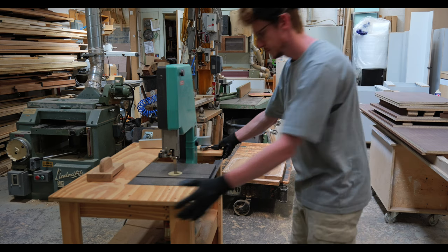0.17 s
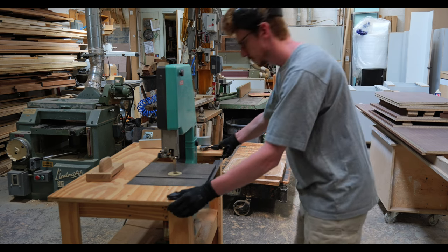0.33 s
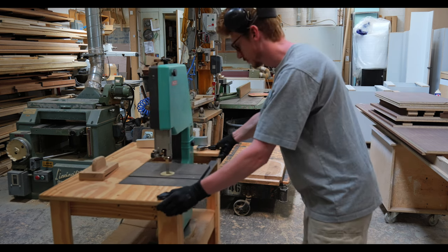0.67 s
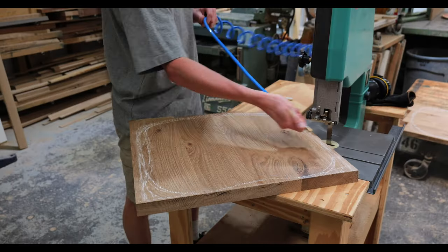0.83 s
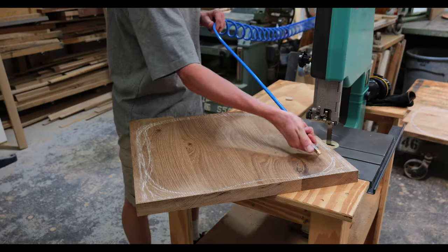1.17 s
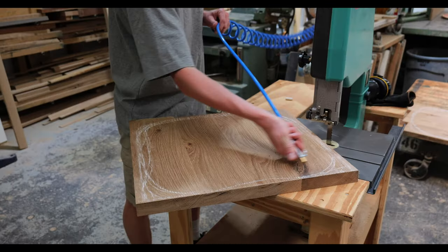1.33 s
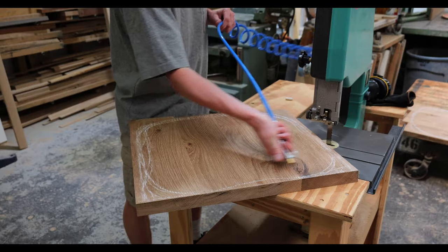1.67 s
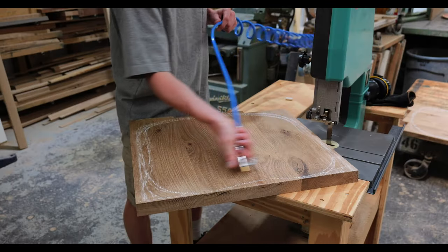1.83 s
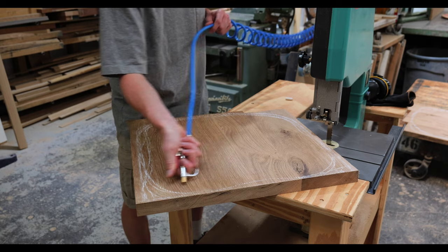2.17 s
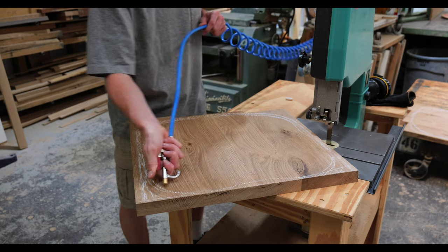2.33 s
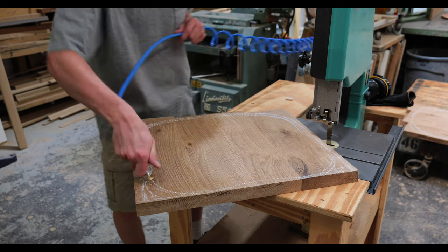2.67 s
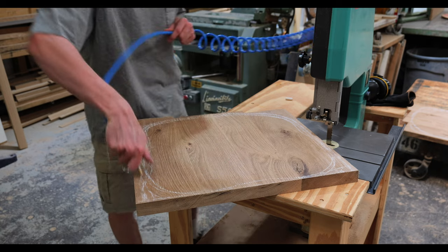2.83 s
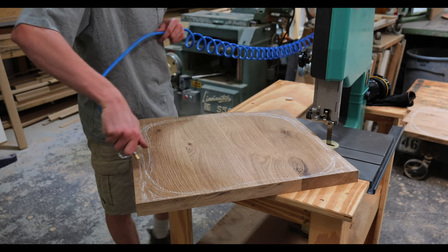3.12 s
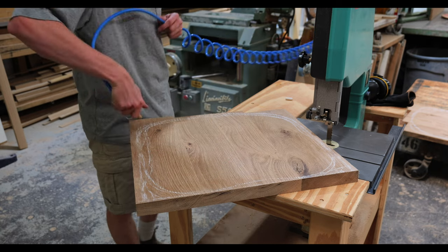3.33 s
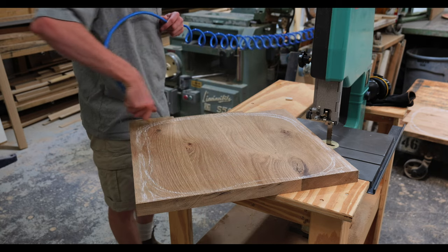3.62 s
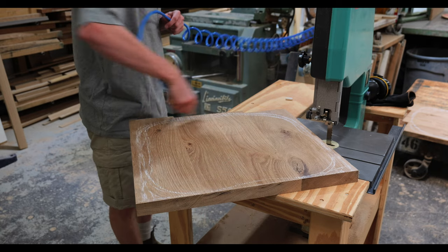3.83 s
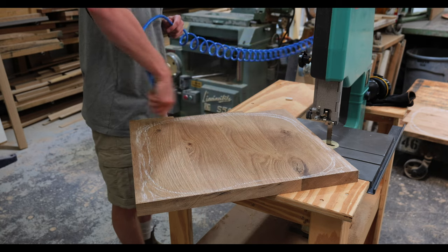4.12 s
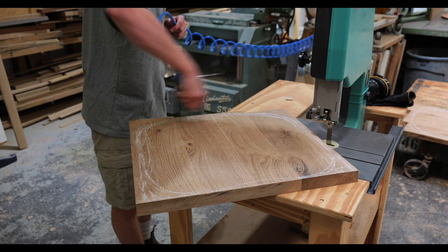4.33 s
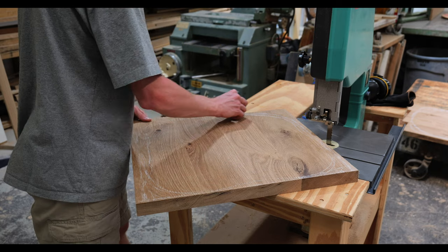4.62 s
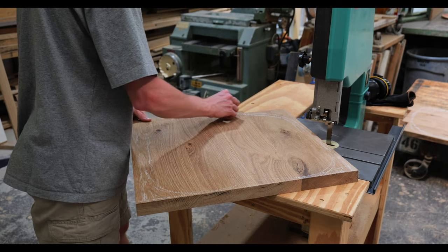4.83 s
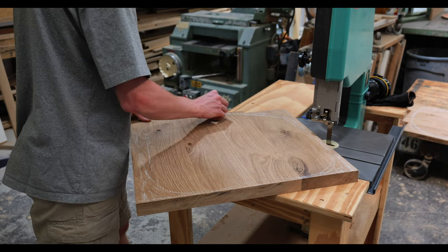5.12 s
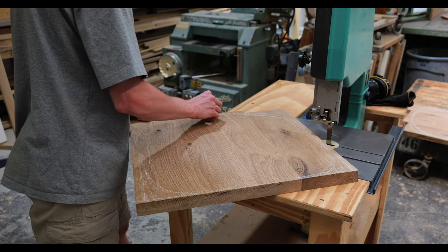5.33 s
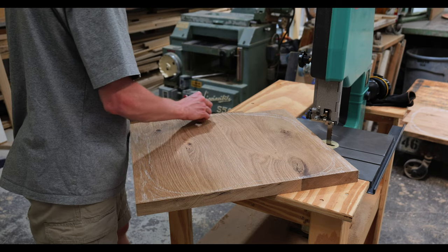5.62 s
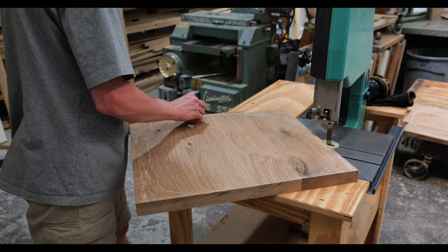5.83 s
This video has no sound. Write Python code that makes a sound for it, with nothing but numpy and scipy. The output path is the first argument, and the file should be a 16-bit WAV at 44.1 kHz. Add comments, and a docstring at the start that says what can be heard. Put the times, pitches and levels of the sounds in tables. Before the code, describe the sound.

In a quiet woodshop, hands knock softly on a wooden bench and a shoe scuffs, followed by one hard clack from across the room. A compressed-air blow gun then hisses loudly and close by, sweeping over a wooden tabletop. The full rush turns into hollow, uneven puffs and high sizzles at the board's edge. The air cuts off abruptly, leaving a faint machine hum and a thin air leak.

```python
"""Hands knock on a band saw's wooden bench, ringing its modes, while a shoe scuffs and a faint high tone
passes; then something clacks hard across the woodshop. The scene changes: a compressed-air blow gun sweeps dust
off an oak tabletop. Its turbulent jet makes a rush on the wood, hollow resonances, a sizzle and a hiss whose
colour swings as the jet crosses the board's edge. The scene changes again, to the shop's steady noise alone: a
machine's hum and a thin leak of air."""
import sys
import numpy as np
from scipy import signal
from scipy.fft import rfft, irfft, next_fast_len
from scipy.io import wavfile
from scipy.ndimage import uniform_filter1d

SR = 44100
rng = np.random.default_rng(int(sys.argv[2]) if len(sys.argv) > 2 else 0)


def int16_out(signal):
    """Quantize to a 16-bit WAV file."""
    q = np.round(np.clip(np.atleast_2d(signal).T, -1, 1) * 32767)
    wavfile.write(sys.argv[1], SR, q.astype(np.int16))


N = 264114
AIR_ON_S, AIR_OFF_S = 0.8727, 4.661
FRAME, HOP = 512, 128
TIME = np.arange(N) / SR
FRAME_S = np.arange(N // HOP + 2) * HOP / SR
BIN_HZ = np.maximum(np.fft.rfftfreq(FRAME, 1 / SR), 1)[:, None]

# reverberation time of the shop: f/Hz, T60/s
SHOP_T60 = [(150, 0.48), (1000, 0.61), (3000, 0.56), (7000, 0.74), (15000, 0.13)]
# the jet moves from mid-board to the edge: t/s, unsteadiness, lowest resonance's width/Hz, rush corner f/Hz
GRAZE = [(.9, 0.57, 168, 446), (2.1, 0.62, 220, 440), (2.65, 1.1, 360, 387), (2.8, 1.1, 600, 680),
         (3.7, 0.73, 636, 550), (4.6, 1.17, 610, 566)]
# the lowest resonance follows the nozzle's aim: t/s, f/Hz, relative level/dB
AIM = [(.9, 1670, -0.5), (1.2, 1705, 4.5), (1.5, 1830, 3.5), (1.95, 1720, 1), (2.35, 1910, -2),
       (2.8, 1840, -5.5), (3.05, 1950, 4), (3.25, 1980, -2.5), (4.45, 2070, -4.5), (4.62, 1970, -1)]


def amp(db):
    """Amplitude ratio of a level in decibels."""
    return 10 ** (np.asarray(db) / 20)


def rms_one(x):
    """Normalisation to unit rms."""
    return x / np.sqrt(np.mean(x ** 2) + 1e-20)


def follow(rows, times):
    """Linear interpolation of each column of a table in time."""
    s, *columns = np.transpose(rows)
    return [np.interp(times, s, c) for c in columns]


def at_hz(points, hz):
    """Interpolation on a logarithmic frequency axis."""
    f, value = np.transpose(points)
    return np.interp(np.log(np.maximum(hz, 1)), np.log(f), value)


def drift(rate_hz):
    """Random modulation: low-passed noise, softly bounded, with a spread near 1."""
    pole = np.exp(-80 * np.pi * rate_hz / SR)   # one step per 40 samples
    slow = signal.lfilter([1], [1, -2 * pole, pole * pole], rng.standard_normal(N // 40 + 2002))[2000:]
    bounded = 2 * np.tanh(rms_one(slow) / 1.7)
    return np.interp(np.arange(N) / 40, np.arange(len(slow)), bounded)


def steady_noise(spectrum):
    """Stationary noise of a given spectral shape and unit rms."""
    size = next_fast_len(N, True)
    gain = amp(at_hz(spectrum, np.fft.rfftfreq(size, 1 / SR)))
    return rms_one(irfft(rfft(rng.standard_normal(size)) * gain, size)[:N])


def moving_noise(gain):
    """Time-varying filtering of white noise, with one gain per bin and frame."""
    frames = signal.stft(rng.standard_normal(N), nperseg=FRAME, noverlap=FRAME - HOP)[2]
    return signal.istft(frames * gain[:, :frames.shape[1]], nperseg=FRAME, noverlap=FRAME - HOP)[1][:N]


def burst(start_s, t60):
    """Exponential decay from a sudden onset."""
    return (TIME >= start_s) * amp(np.maximum(-60 * np.abs(TIME - start_s) / t60, -300))


def swell(middle_s, length_s):
    """Gaussian envelope, about 9 dB down at either end of its length."""
    return np.exp(-np.minimum((2 * (TIME - middle_s) / length_s) ** 2, 50))


def reverberation(x, build_s=0.017):
    """Diffuse field of the shop: a decaying tail of unit energy whose highest treble dies first."""
    tail = moving_noise(amp(-60 * FRAME_S / at_hz(SHOP_T60, BIN_HZ)))[:SR]
    tail = tail * np.clip(TIME[:SR] / build_s, 0, 1) ** 2
    return signal.fftconvolve(x, tail / np.sqrt(np.sum(tail ** 2)))[:N]


def quiet_shop(level_db=-65.5):
    """Ambient noise: stationary, broadband and strongest in the bass."""
    # ambient spectrum: f/Hz, relative level/dB
    spectrum = [(18, -63), (30, -56), (111, -6.5), (379, -8.5), (575, -17), (622, -15), (1140, -14),
                (1330, -16), (1910, -18), (2240, -20.5), (15500, -29.5)]
    return amp(level_db) * steady_noise(spectrum)


def ring(x, hz, t60):
    """Forced response of a damped mode with unit gain at resonance."""
    r = amp(-60 / (t60 * SR))
    feedback = [1, -2 * r * np.cos(2 * np.pi * hz / SR), r * r]
    return signal.lfilter((1 - r * r) / 2 * np.array([1, 0, -1]), feedback, x)


def knocks(push_db=-7, grit_db=-18.5, ring_db=10, room_db=-3):
    """Impact excitation: a force pulse, duller when soft, and a little grit drive the bench's modes."""
    # contacts of the hands: t/s, relative level/dB, upper corner f/Hz, grit T60/s
    contacts = [(.054, -45.5, 2600, 0.017), (0.117, -45, 1800, 0.041), (0.227, -44, 288, 0.032),
                (0.373, -41, 1500, .025), (0.386, -47, 500, .03), (.42, -38.5, 1900, 0.022),
                (.469, -35, 1500, 0.02)]
    # modes of the bench: f/Hz, relative level/dB, T60/s
    modes = [(140, -15, 0.16), (220, -7, .15), (280, -2, 0.24), (492, 1, 0.11), (844, 3.5, 0.13),
             (1115, -1, 0.067), (1500, -6, 0.038)]
    force = 0
    for s, db, bright_hz, t60 in contacts:
        softness = signal.butter(4, [120, bright_hz], "band", fs=SR, output="sos")
        push = signal.sosfilt(softness, (np.arange(N) == round(s * SR)) + 1e-18)
        grit = burst(s, t60) * rms_one(signal.sosfilt(softness, rng.standard_normal(N)))
        force = force + amp(db) * (amp(push_db) * push / push.max() + amp(grit_db) * grit)
    wood = force + amp(ring_db) * sum(amp(db) * ring(force, hz, t60) for hz, db, t60 in modes)
    return wood + amp(room_db) * reverberation(wood)


def shuffle(room_db=-3):
    """Friction noise: soles slide on gritty concrete in uneven slips."""
    # slides of a sole: middle t/s, duration/s, thud level/dB, scuff level/dB
    slides = [(0.18, 0.075, -56, -55.5), (.375, 0.076, -62, -64.5), (0.488, 0.1, -54.5, -80),
              (0.7, .2, -63, -70)]
    # spectra of the low thud and the brighter scuff: f/Hz, relative level/dB
    thud_spectrum = [(29, -62), (50, -35), (129, -17), (221, 2.5), (275, 0.5), (313, -8), (503, -5),
                     (721, -7.5), (800, -8), (1040, -28), (1760, -120)]
    scuff_spectrum = [(350, -24), (600, -18), (1030, -2), (1180, -7.5), (1840, -5), (2360, -14),
                      (2590, -10.5), (4880, -23), (14000, -33)]
    thud_gain = sum(amp(db) * swell(s, length_s) for s, length_s, db, _ in slides)
    scuff_gain = sum(amp(db) * swell(s, length_s) for s, length_s, _, db in slides)
    thud = steady_noise(thud_spectrum) * thud_gain * amp(1.1 * drift(25))
    scuff = steady_noise(scuff_spectrum) * scuff_gain * amp(1.1 * drift(70))
    return thud + scuff + amp(room_db) * reverberation(thud + scuff)


def thin_tone(hz=11380, level_db=-78):
    """A faint pure tone under a Gaussian envelope."""
    return amp(level_db) * swell(middle_s=.365, length_s=.17) * np.sin(2 * np.pi * hz * TIME)


def clack(start_s=.748, hit_db=-32.5, crack_db=-56, room_db=-41, rise_s=0.004, build_s=0.021):
    """Direct and reverberant sound of a hard, distant impact: a bright crack, then the room's wash."""
    # spectrum of the impact: f/Hz, relative level/dB
    spectrum = [(100, -39), (170, -24), (278, 3), (400, -13), (520, -2.5), (700, -9), (850, -3.5),
                (1200, -1), (1800, -4), (2400, -5), (3300, -7.5), (4000, -16), (5000, -17.5), (7600, -28.5),
                (15000, -32)]
    age_s = TIME - start_s
    hit = amp(hit_db) * burst(start_s, t60=0.044) * np.clip(age_s / rise_s, 0, 1) * steady_noise(spectrum)
    crack = amp(crack_db) * burst(start_s, t60=0.017) * rng.standard_normal(N)
    decay = amp(-60 * np.maximum(FRAME_S - start_s, 0) / at_hz(SHOP_T60, BIN_HZ))
    wash = moving_noise(rms_one(amp(at_hz(spectrum, BIN_HZ))) * decay)
    return hit + crack + amp(room_db) * wash * np.clip(age_s / build_s, 0, 1)


def unsteadiness(times):
    """Relative strength of the flow's fluctuations, greater at the board's edge."""
    return follow(GRAZE, times)[0]


def flutter(depth_db, rate_hz):
    """Amplitude modulation by eddies, its depth scaled by the flow's unsteadiness."""
    return amp(depth_db * unsteadiness(TIME) * drift(rate_hz))


def wander(share, rate_hz):
    """Frequency modulation by the unsteady flow: a factor near 1 for each frame."""
    return 1 + share * unsteadiness(FRAME_S) * np.interp(FRAME_S, TIME, drift(rate_hz))


def turbulence(power, patchy_db, eddy_frames=12, eddy_bins=6):
    """Turbulent noise of rms near 1: eddies make narrow bands flare and fade independently."""
    eddies = rng.standard_normal(power.shape)
    for _ in range(2):
        eddies = uniform_filter1d(uniform_filter1d(eddies, eddy_frames, axis=1), eddy_bins, axis=0)
    power = power * amp(patchy_db * unsteadiness(FRAME_S) * rms_one(eddies)) ** 2
    return moving_noise(np.sqrt(power / power.mean(axis=0)))


def resonance(hz, width_hz):
    """Power response of a damped resonator, 1 at its peak."""
    return 1 / (1 + ((BIN_HZ ** 2 - hz ** 2) / (BIN_HZ * width_hz)) ** 2)


def rolloff(ratio, exponent):
    """Power response of a filter slope, one half where the frequency ratio is 1."""
    return 1 / (1 + ratio ** exponent)


def rush(bass_db=-15, puff_db=3):
    """Jet impingement: a full rush on the face of the wood turns into hollow puffs at its edge."""
    # spectrum of the rush: f/Hz, relative level/dB
    spectrum = [(100, -34), (220, -2.5), (420, 3.5), (560, 2.5), (790, 1.5), (1080, 2), (1400, 5),
                (2200, -12), (5000, -26)]
    # the rush dies as the jet leaves the face: t/s, level/dB
    levels = [(.92, -62), (1.5, -53), (1.7, -55.5), (1.97, -51.5), (2.45, -57.5), (2.65, -56.5),
              (2.72, -71.5), (3.4, -74), (4.6, -70.5)]
    # the jet catches the edge: middle t/s, duration/s, level/dB
    puffs = [(2.806, 0.02, -60.5), (2.91, 0.024, -62), (3.098, 0.12, -55), (3.893, 0.061, -57),
             (4.018, 0.11, -57.5), (4.123, 0.1, -58), (4.414, 0.1, -59.5), (4.574, .11, -57)]
    graze, _, corner_hz = follow(GRAZE, FRAME_S)
    body = amp(at_hz(spectrum, BIN_HZ)) ** 2 * (rolloff(corner_hz / BIN_HZ, 8) + amp(bass_db) ** 2)
    puff = (amp(puff_db) * graze * resonance(hz=790, width_hz=420)) ** 2
    gain = amp(follow(levels, TIME)[0]) + sum(amp(db) * swell(s, length_s) for s, length_s, db in puffs)
    return turbulence(body + puff, patchy_db=4.0) * gain * flutter(1.1, rate_hz=19)


def hollow_resonances(turned, lower_hz=1480, upper_hz=5400, dulling_hz=600):
    """Resonances driven by the jet on the board radiate in a band that narrows as the nozzle turns."""
    # stationary resonances: f/Hz, width/Hz, relative level/dB
    fixed_modes = [(3633, 490, -1.5), (4050, 650, -.5), (2520, 740, -11.5)]
    # all resonances together: t/s, level/dB
    levels = [(0.92, -45), (2.01, -40.5), (2.19, -37), (2.39, -37.5), (2.63, -48.5), (2.75, -48),
              (2.81, -39.5), (2.97, -53.5), (3.16, -43), (3.36, -47.5), (3.42, -53.5), (3.47, -43.5),
              (3.6, -46.5), (3.64, -43), (4.39, -43), (4.45, -46.5), (4.61, -42), (4.65, -46)]
    lowest_hz, lowest_db = follow(AIM, FRAME_S)
    _, lowest_width_hz, _ = follow(GRAZE, FRAME_S)
    modes = resonance(lowest_hz, lowest_width_hz) * amp(lowest_db) ** 2
    modes = modes + sum(resonance(hz, width_hz) * amp(db) ** 2 for hz, width_hz, db in fixed_modes)
    band = rolloff(lower_hz / BIN_HZ, 14) * rolloff(BIN_HZ / (upper_hz - dulling_hz * turned), 12)
    gain = amp(follow(levels, TIME)[0]) * flutter(0.5, rate_hz=42)
    return turbulence(modes * band, patchy_db=1.8) * gain


def hiss(edge_hz, turned, crest_db=-2, floor_db=-22, comb_depth=0.16):
    """Broadband jet noise that crests just under a trembling upper cutoff."""
    # spectrum of the hiss: f/Hz, relative level/dB
    spectrum = [(200, -33), (700, -20.5), (1500, -19.5), (3000, -5.5), (4900, -2), (5700, 2.5), (6600, 0),
                (7900, 2.5), (9500, 1), (12000, -14), (16000, -10)]
    # strength of the hiss: t/s, level/dB
    levels = [(0.92, -42.5), (1.06, -43), (1.21, -41), (1.96, -40), (1.99, -38), (2.45, -38), (2.5, -44),
              (2.69, -45), (2.89, -39), (3.15, -44.5), (3.42, -45.5), (3.47, -48.5), (3.86, -41.5),
              (4.04, -52.5), (4.13, -44.5), (4.41, -59), (4.62, -50.5), (4.65, -55)]
    edge_hz = edge_hz * wander(share=0.056, rate_hz=25)
    crest = amp(crest_db) ** 2 * resonance(0.97 * edge_hz, width_hz=890) ** 2
    top = rolloff(BIN_HZ / edge_hz, 30) + amp(floor_db) ** 2 + crest
    # with the nozzle turned away, power gathers at multiples of the lowest resonance
    lowest_hz, _ = follow(AIM, FRAME_S)
    comb = 1 + comb_depth * turned * np.cos(2 * np.pi * BIN_HZ / lowest_hz)
    gain = amp(follow(levels, TIME)[0]) * flutter(0.56, rate_hz=35)
    return turbulence(amp(at_hz(spectrum, BIN_HZ)) ** 2 * top * comb, patchy_db=1.5) * gain


def sizzle_band(hz, width_hz, ceiling_hz=12700):
    """Band-pass spectrum of unit power under a steep ceiling."""
    power = resonance(hz, width_hz) ** 2 * rolloff(BIN_HZ / ceiling_hz, 40)
    return power / power.sum(axis=0)


def flare(start_s, end_s, rise_s=0.1, fall_s=0.081):
    """Exponential attack and release around a hold; rise and fall times are for 20 dB."""
    outside = np.maximum(start_s - FRAME_S, 0) / rise_s + np.maximum(FRAME_S - end_s, 0) / fall_s
    return amp(-20 * np.minimum(outside, 10))


def sizzle_and_spray():
    """Narrow-band sizzle and broadband spray, both flaring where the jet grazes an edge."""
    # fizz on the wood, fading as the jet moves off: t/s, sizzle level/dB, spray level/dB
    fizz = [(.9, -48, -45.5), (1.65, -54, -43.5), (2.0, -47, -42.5), (2.5, -48, -45), (2.78, -52.5, -55),
            (3.15, -48.5, -57), (3.72, -63, -62), (4.65, -65, -68)]
    # flares: start t/s, end t/s, first f/Hz, last f/Hz, width/Hz, sizzle level/dB, swell/dB, spray level/dB
    flares = [(0.898, 1.18, 7500, 11000, 2100, -41, -2.5, -66),
              (2.86, 2.952, 11300, 11400, 1500, -44.5, 0, -49),
              (3.187, 3.31, 11800, 11500, 1900, -42, 6, -44),
              (3.347, 3.426, 10900, 10300, 3100, -38.5, 1, -70),
              (3.46, 3.616, 11900, 12000, 950, -42, 3, -49),
              (4.3, 4.488, 12000, 11000, 1000, -48.5, 9, -51)]
    # spectrum of the fine spray: f/Hz, relative level/dB
    spray_spectrum = [(2000, -32), (8000, 4.5), (11000, 10.5), (12200, 13.5), (13300, 5), (16000, 1.5)]
    fizz_db, fine_db = follow(fizz, FRAME_S)
    fizz_hz = 11570 * wander(share=.014, rate_hz=43)
    power = sizzle_band(fizz_hz, width_hz=1100) * amp(fizz_db) ** 2
    spray_power = amp(fine_db) ** 2
    tremble = wander(share=.035, rate_hz=30)
    for start_s, end_s, first_hz, last_hz, width_hz, db, swell_db, spray_db in flares:
        progress = np.clip((FRAME_S - start_s) / (end_s - start_s), 0, 1)
        envelope = flare(start_s, end_s)
        gain = amp(db + swell_db * (progress - .5)) * envelope
        glide_hz = first_hz + (last_hz - first_hz) * progress ** 3   # the pitch bends late
        power = power + gain ** 2 * sizzle_band(tremble * glide_hz, width_hz)
        spray_power = spray_power + (amp(spray_db) * envelope) ** 2
    sizzle = turbulence(power, patchy_db=2.5) * np.interp(TIME, FRAME_S, np.sqrt(power.sum(axis=0)))
    spray = steady_noise(spray_spectrum) * np.interp(TIME, FRAME_S, np.sqrt(spray_power))
    return sizzle * flutter(0.76, rate_hz=35) + spray * flutter(1.1, rate_hz=35)


def reflections(x, sway_s=0.00016, sway_hz=1.01):
    """Comb filtering: short echoes interfere with the direct sound, their paths shifting with the hand."""
    # echoes from board, bench and saw: delay/s, relative level/dB
    echoes = [(.0014, -20), (.0025, -21), (.0046, -23), (.0083, -15)]
    oversampled = signal.resample_poly(x, 2, 1)
    for mean_delay_s, db in echoes:
        delay_s = mean_delay_s + sway_s * drift(sway_hz)
        echo = np.interp(2 * SR * (TIME - delay_s), np.arange(len(oversampled)), oversampled)
        x = x + amp(db) * unsteadiness(TIME) * echo
    return x


def blow_gun(square_hz=11000, turned_hz=7500, room_db=-14, low_cut_hz=135, open_s=0.044, close_s=0.0022):
    """Superposition of the jet's noise sources, modulated by their shared flow and gated on and off abruptly."""
    # upper cutoff of the hiss, falling as the nozzle turns away: t/s, f/Hz
    hiss_edge = [(.9, 10200), (1.5, 11800), (3.0, 11700), (3.4, 9600), (3.53, 6650), (3.85, 9800),
                 (3.97, 8700), (4.17, 9360), (4.26, 6300), (4.48, 6060), (4.62, 9200)]
    edge_hz, = follow(hiss_edge, FRAME_S)
    turned = np.clip((square_hz - edge_hz) / (square_hz - turned_hz), 0, 1)   # 0 square on, 1 turned away
    air = rush() + hollow_resonances(turned) + hiss(edge_hz, turned) + sizzle_and_spray()
    air = reflections(air * flutter(0.18, rate_hz=50))
    air = air + amp(room_db) * reverberation(air)
    air = signal.sosfilt(signal.butter(4, low_cut_hz, "high", fs=SR, output="sos"), air)
    gate = np.clip((TIME - AIR_ON_S) / open_s, 0, 1) ** 1.3 * np.clip((AIR_OFF_S - TIME) / close_s, 0, 1)
    return air * gate


def machine_and_leak(low_db=-63, leak_db=-63, room_db=-2):
    """Line and continuous spectra: a machine's wavering hum over low shop noise and a thin air leak."""
    # spectra of the low noise and the leak: f/Hz, relative level/dB
    low_spectrum = [(30, -40), (55, -20), (85, -21), (118, -3), (180, -6), (233, 0), (300, -4.5),
                    (470, -4.5), (620, -5.5), (780, -13.5), (1050, -10), (1350, -10), (1650, -11.5),
                    (2300, -9), (2950, -10), (3400, -20.5), (5000, -43)]
    leak_spectrum = [(2500, -8), (3400, -4), (3750, 0), (4400, -4.5), (5900, -2.5), (6500, 2.5),
                     (7600, 1.5), (8700, 0), (9700, -6), (11000, -5.5), (13000, -7), (15500, -12)]
    # partials of the hum: f/Hz, level/dB
    partials = [(231.5, -77), (463.0, -76), (1039, -73.5), (1351, -74), (2019, -84), (3704, -79)]
    noise = amp(low_db) * steady_noise(low_spectrum) + amp(leak_db) * steady_noise(leak_spectrum)
    hum = sum(amp(db + 1.2 * drift(6.7)) * np.sin(2 * np.pi * hz * TIME + .5 * drift(3.2))
              for hz, db in partials)
    return noise + amp(room_db) * reverberation(noise) + hum


def scene(under_jet_db=-27):
    """Superposition in mono of three abruptly joined stretches; hum and leak are fainter under the jet."""
    handling = quiet_shop() + knocks() + shuffle() + thin_tone() + clack()
    before_jet = np.clip((AIR_ON_S - TIME) / 0.0089, 0, 1)
    after_jet = np.clip((TIME - AIR_OFF_S) / 0.0018 + 1, 0, 1)
    shop_gain = np.maximum(after_jet, amp(under_jet_db) * (1 - before_jet))
    mono = before_jet * handling + blow_gun() + shop_gain * machine_and_leak()
    return np.array([mono, mono])


def record(dry, low_hz=55, high_hz=15800):
    """Band limiting: the deep bass rolls off and the top is cut steeply."""
    thin = signal.sosfilt(signal.butter(2, low_hz, "high", fs=SR, output="sos"), dry)
    return signal.sosfilt(signal.ellip(12, .1, 70, high_hz, fs=SR, output="sos"), thin)


dry = scene()
out = record(dry)
int16_out(out)
```